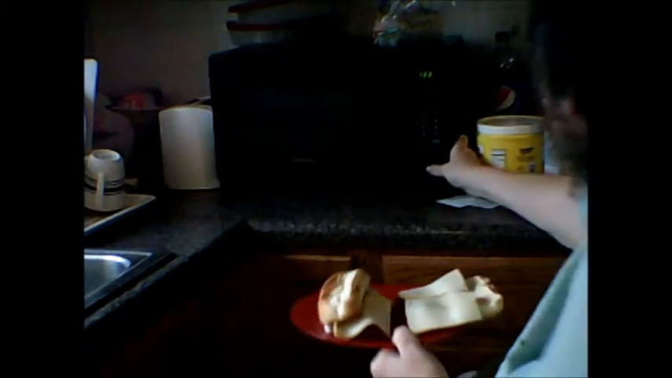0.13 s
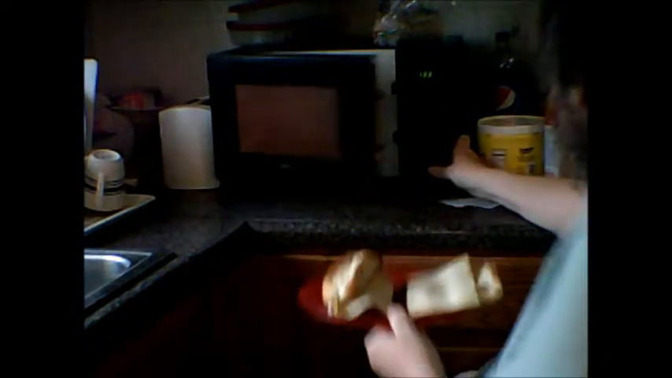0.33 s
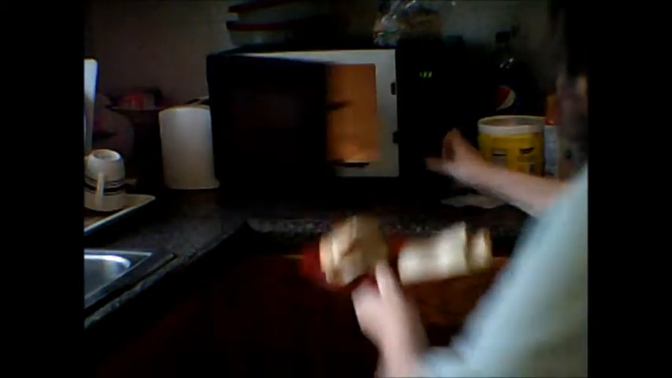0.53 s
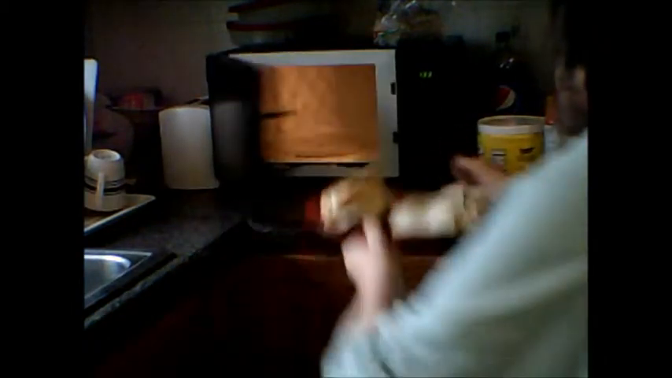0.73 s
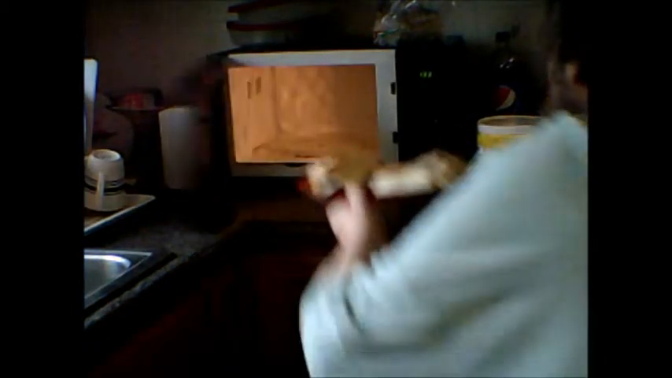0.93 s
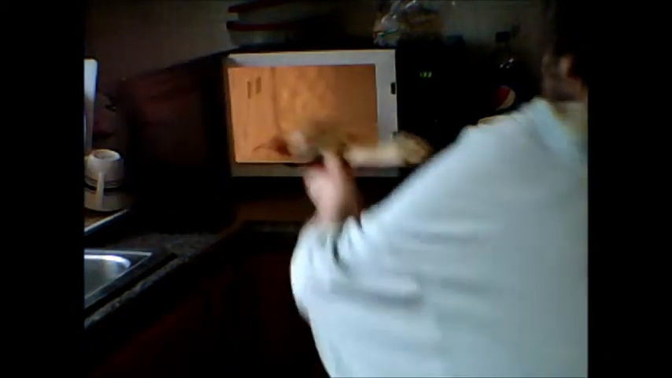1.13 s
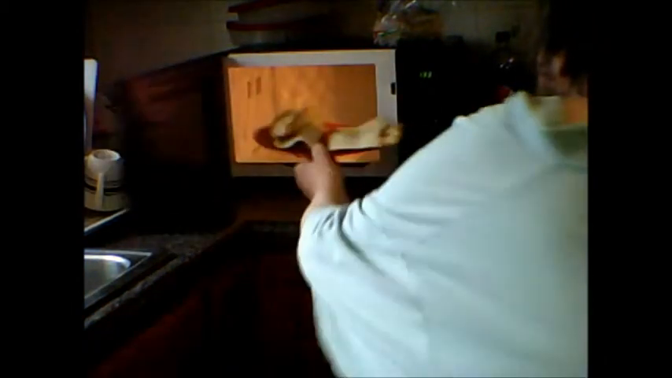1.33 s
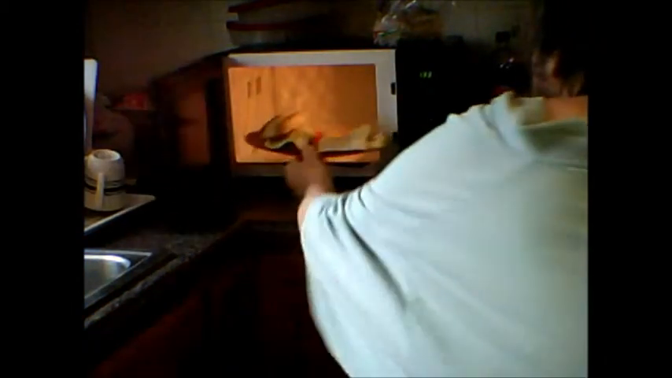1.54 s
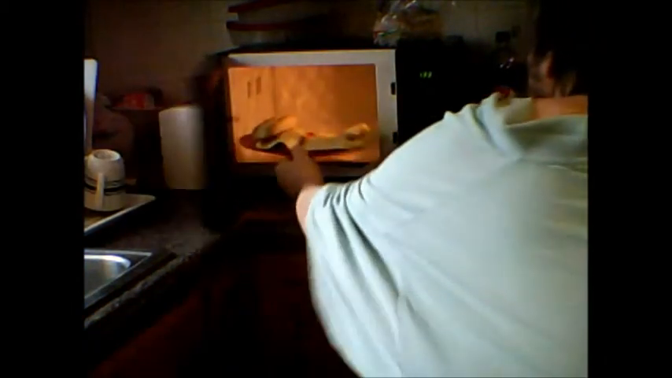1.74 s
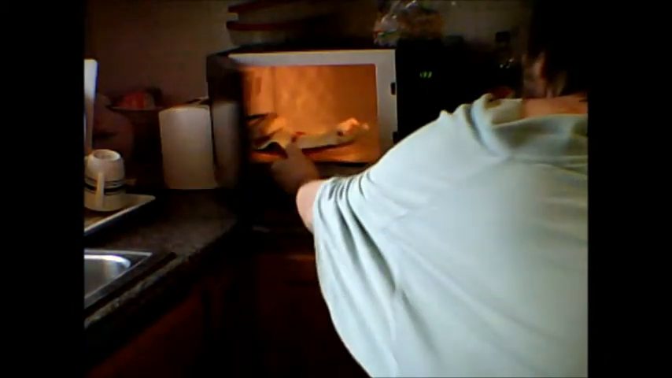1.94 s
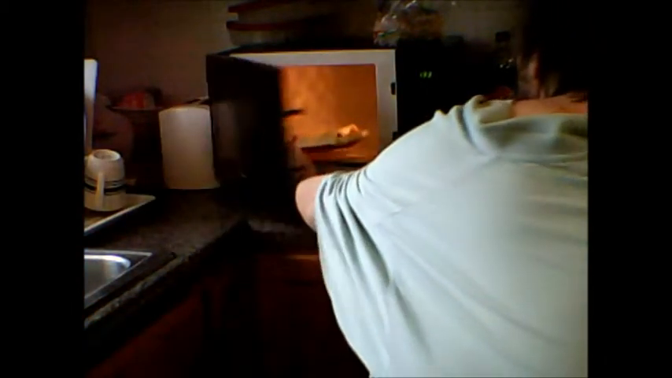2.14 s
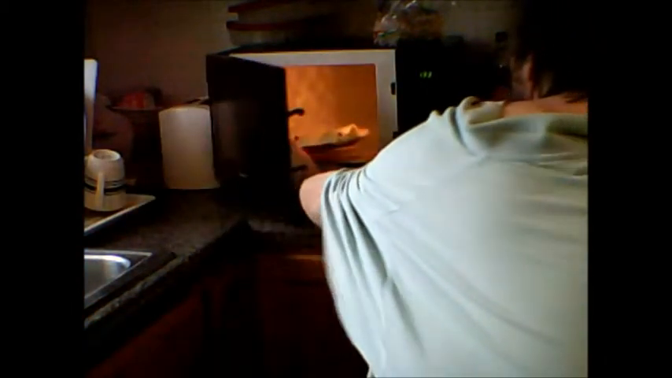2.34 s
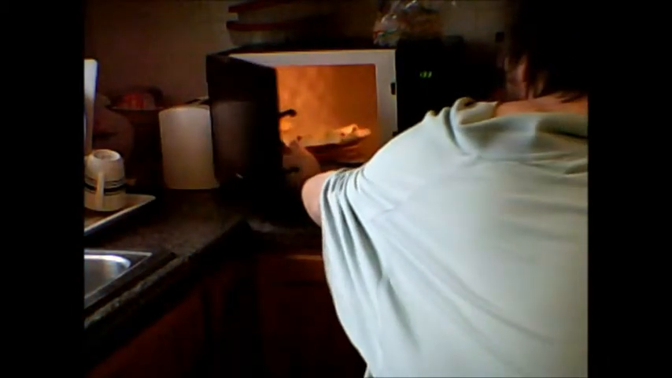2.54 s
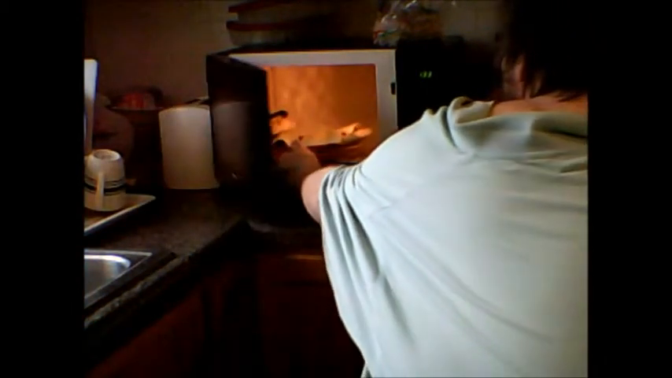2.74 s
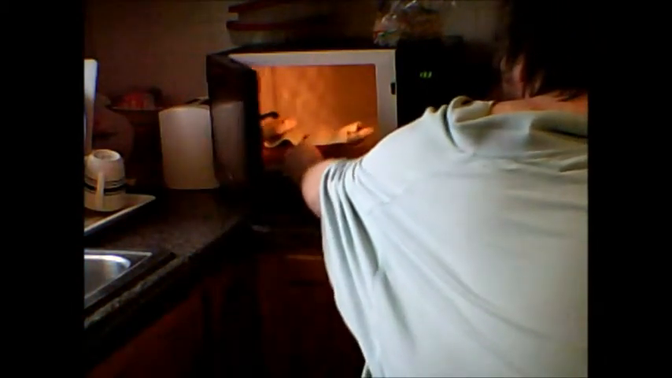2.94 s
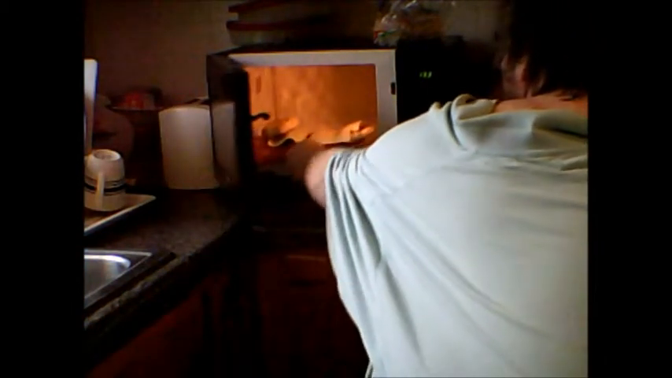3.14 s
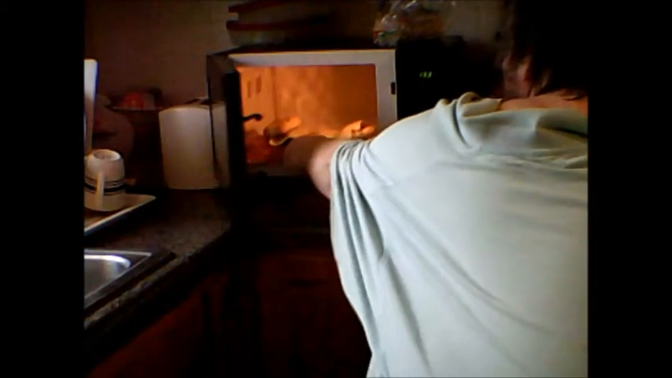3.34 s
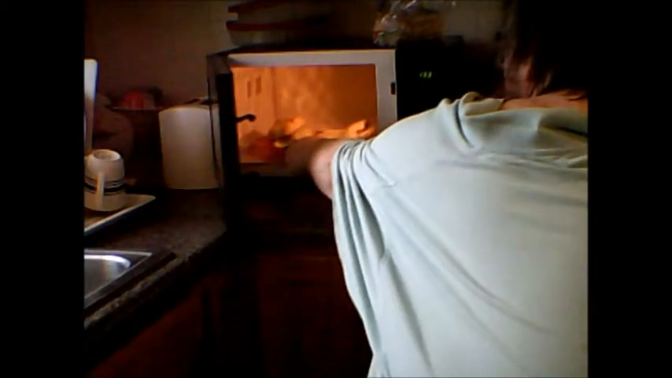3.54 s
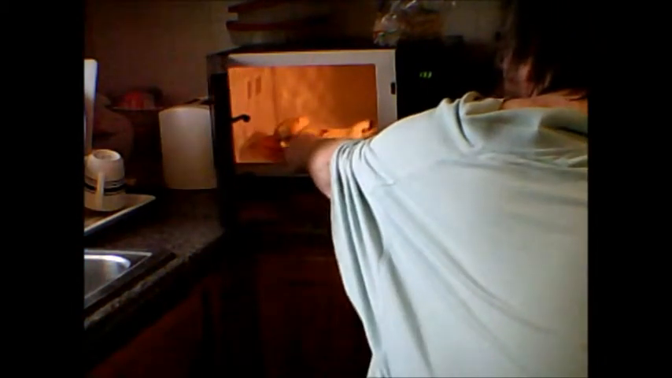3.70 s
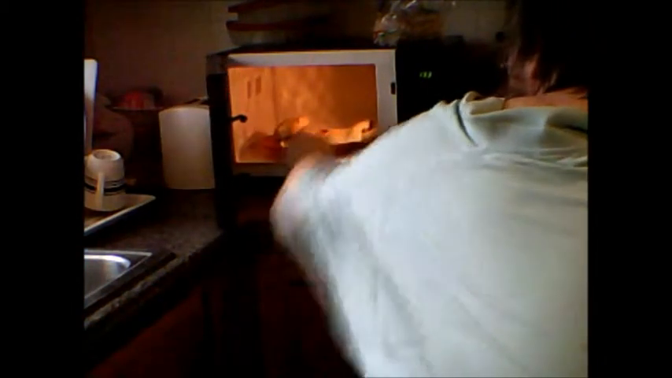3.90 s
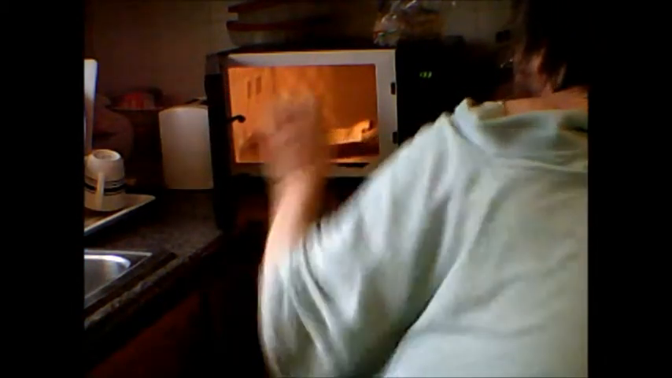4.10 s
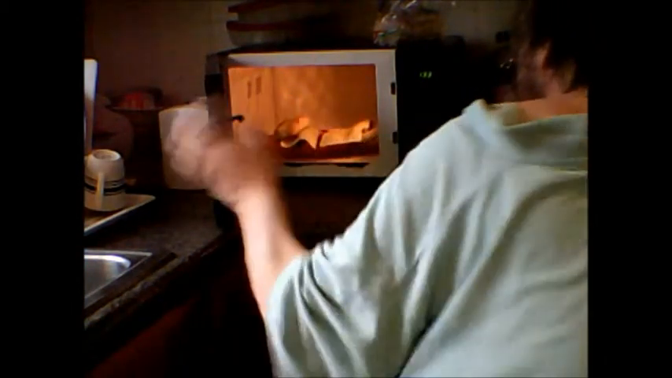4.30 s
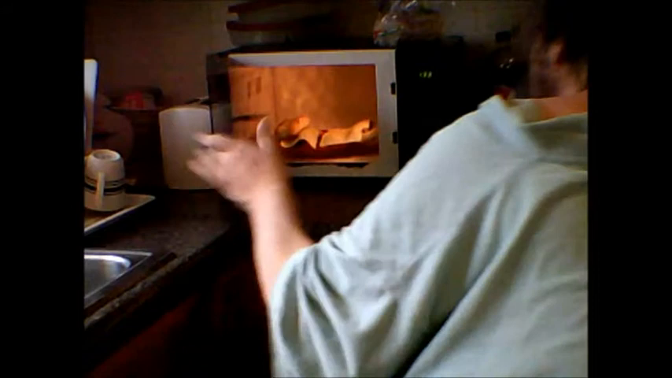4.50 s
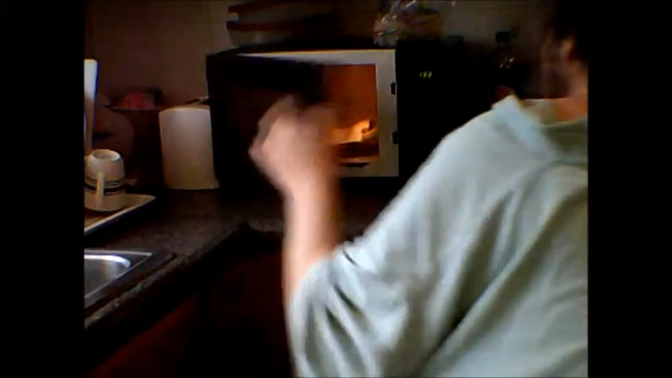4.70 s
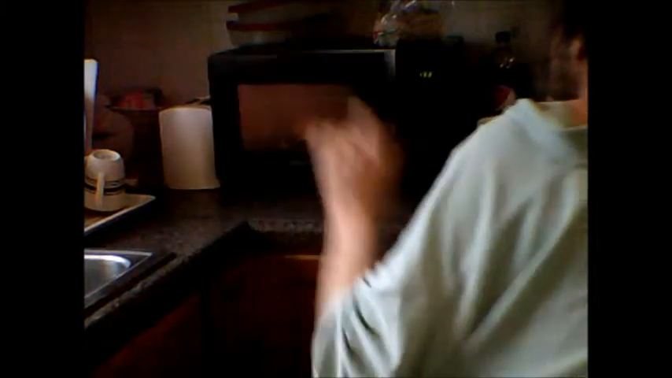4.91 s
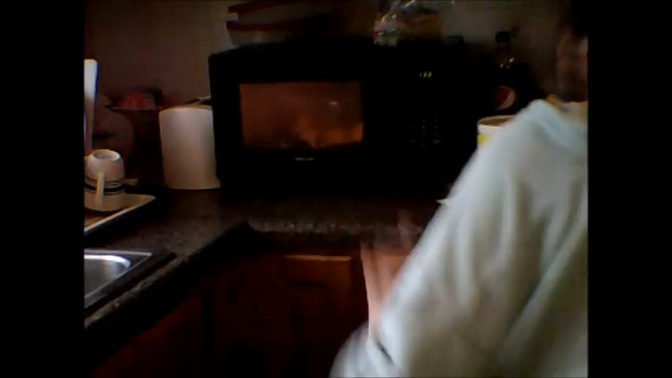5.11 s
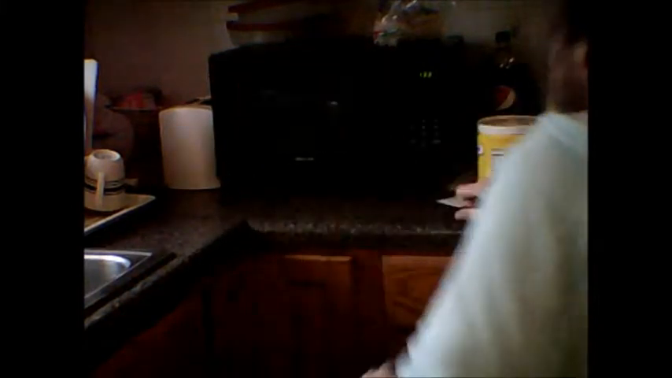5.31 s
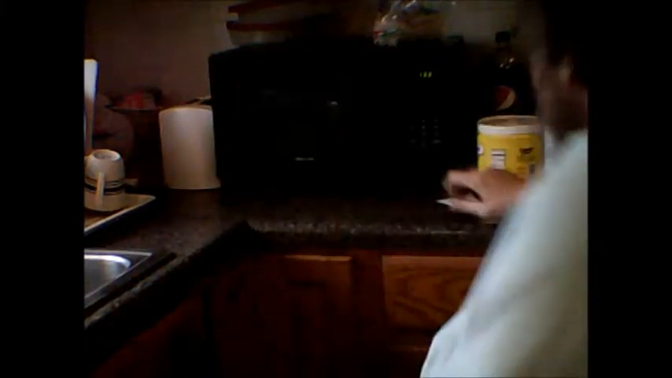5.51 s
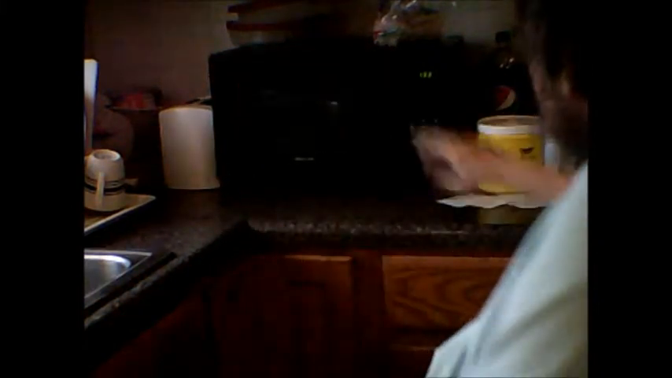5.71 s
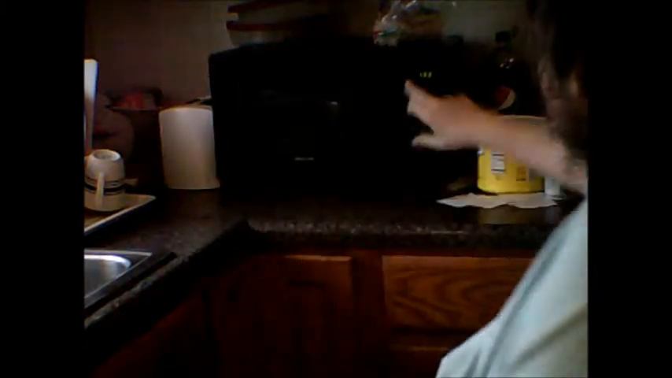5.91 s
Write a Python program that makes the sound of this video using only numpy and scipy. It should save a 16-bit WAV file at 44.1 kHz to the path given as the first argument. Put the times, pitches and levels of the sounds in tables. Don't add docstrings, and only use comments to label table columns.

```python
import sys
import numpy as np
from scipy import signal
from scipy.io import wavfile
from scipy.ndimage import uniform_filter1d

SR = 44100
rng = np.random.default_rng(int(sys.argv[2]) if len(sys.argv) > 2 else 0)


def voltage_ratio(level):
    return 10 ** (np.asarray(level, float) / 20)


def put_to_file(sound):
    columns = np.atleast_2d(sound).T
    safe = np.clip(columns, -1, 1)
    whole_steps = np.round(safe * 32767)
    wavfile.write(sys.argv[1], SR, whole_steps.astype(np.int16))


N = 266829


# frequency in Hz, level in dB, t60 in s.
BOOM = [(28.05, -14, 0.44), (45, 16.5, 0.28), (116.8, -4.5, 0.9)]


def blows(rows, hue, modes):
    out = np.zeros(N)
    for s, db, length, ring_db, thump_db in rows:
        clatter = colour(rattle(length), hue)
        add(out, s, voltage_ratio(db) * peaked(signal.fftconvolve(clatter, kitchen())))
        add(out, s, voltage_ratio(db + ring_db + 1) * ring(modes, 1.04 * length, damp=0.39))
        add(out, s, voltage_ratio(thump_db) * ring(BOOM, 0.013))
    return out


# start in seconds, level in dB, rattle length in s,
# ringing in dB over the level, thump level in dB.
SLAM = [
    (4.922, -16, 0.0084, 0.0044, -51),
    (4.934, -21.5, 0.014, 0.0073, -20.5),
    (4.942, -46.5, 0.0084, 0.0043, -33),
    (4.955, -27.5, 0.015, 0.0066, -42),
]
# frequency in Hz, level in dB per Hz.
SLAM_HUE = [(60, -19.5), (134, -2), (370, -12.5), (520, -7.5), (810, -9.5), (1030, -14.5), (2100, -15),
            (3300, -26.5), (5000, -26), (7500, -24.5)]
# frequency in Hz, level in dB, t60 in s.
SLAM_RING = [(131.4, -0.5, 0.31), (233, -20, 0.14), (312, 4, 0.26), (389, -15, 0.25), (484, 2.5, 0.13),
             (615, -8, 0.27), (664, -20, 0.62), (722.6, -2, 0.34), (815, -8, 0.6), (890, -9.5, 0.55),
             (996, -10.5, 0.48), (1118, -4, 0.22), (1336, -18, .25), (1532, -7, 0.15), (2038, -3, 0.14),
             (2457, -13, 0.1), (2520, -43, .2)]


def slam():
    return blows(SLAM, SLAM_HUE, SLAM_RING)


# start in seconds, level in dB, rattle length in s,
# ringing in dB over the level, thump level in dB.
HOOKS = [
    (4.879, -32, 0.017, 2.7, -53),
    (4.890, -42.5, 0.0077, 14.5, -57),
    (4.908, -42.5, 0.036, 21.1, -31),
]
# frequency in Hz, level in dB per Hz.
HOOKS_HUE = [(60, -14), (120, -19), (350, -17), (650, -21), (1800, -26.5), (2300, -32), (3400, -32),
             (5000, -40), (7500, -33.5)]
# frequency in Hz, level in dB, t60 in s.
HOOKS_RING = [(116.6, 2, 0.29), (266, -1.5, 0.1), (332.6, -9, 0.47), (836, -17.5, 0.38), (2060, -30, 0.3)]


def hooks():
    return blows(HOOKS, HOOKS_HUE, HOOKS_RING)


# start in seconds, level in dB, rattle length in s,
# ringing in dB over the level, thump level in dB.
STOP = [
    (1.094, -26, 0.01, -4.5, -46),
    (1.111, -30, 0.031, 4.5, -32),
]
# frequency in Hz, level in dB per Hz.
STOP_HUE = [(60, -13.5), (110, 7), (380, -12.5), (560, -2), (830, -4), (1200, -10), (2000, -19),
            (3300, -22), (5000, -25), (7500, -24.5)]
# frequency in Hz, level in dB, t60 in s.
STOP_RING = [(116, 0.5, 0.28), (238.2, -3, 0.53), (316, -7.5, 0.55), (459.3, 1, 0.25), (605, -2.5, 0.31),
             (704, -9, 0.45), (735, -11, 0.3), (824, -2.5, 0.52), (978, -7, 0.26), (1154, -7.5, 0.46),
             (1290, -21, 0.25), (1524, -14, 0.37), (1526, -21.5, 0.22), (1976, -5, 0.12)]


def stop():
    return blows(STOP, STOP_HUE, STOP_RING)


# start in seconds, level in dB, rattle length in s,
# ringing in dB over the level, thump level in dB.
LATCH = [
    (.164, -33.5, 0.0058, -4.5, -41.5),
    (.168, -32.5, 0.037, -10, -51),
]
# frequency in Hz, level in dB per Hz.
LATCH_HUE = [(60, -59), (130, 4), (190, -8.5), (360, -11), (840, -2), (1250, -12), (1600, -4.5),
             (2300, -13.5), (3200, -15.5), (5000, -19.5), (7500, -20)]
# frequency in Hz, level in dB, t60 in s.
LATCH_RING = [(580, -10, 1), (643, 8, 0.27), (846, -15, 0.33), (980, -10, 0.31), (1137, -14, 0.94),
              (1486, -36, 0.72), (1570, 15.5, 0.13), (1570, -6, 0.43), (1920, -18, 0.56), (2320, -24, 0.3),
              (2360, -22, 0.22), (3240, -10, 0.42), (3530, -27, 0.24), (3840, -37, 0.31)]


def latch():
    return blows(LATCH, LATCH_HUE, LATCH_RING)


# start in seconds, level in dB, rattle length in s,
# ringing in dB over the level, thump level in dB.
BUTTON = [
    (.0, -33.5, 0.02, 0, -55),
    (.036, -29.5, 0.017, 6, -56.5),
    (.046, -51.5, 0.017, 22, -36),
]
# frequency in Hz, level in dB per Hz.
BUTTON_HUE = [(60, -39), (100, -19), (130, -2.5), (340, -13), (600, -22), (870, -22), (2100, -32),
              (3400, -42.5), (5000, -40), (7500, -38.5)]
# frequency in Hz, level in dB, t60 in s.
BUTTON_RING = [(50, -3, 0.72), (129.4, -1.5, 0.38), (217, -13, 0.22), (301.6, -8, 0.28), (542, -19, 0.22),
               (813, -22, 0.24)]


def button():
    return blows(BUTTON, BUTTON_HUE, BUTTON_RING)


# start in seconds, level in dB, weight of the low thud in dB,
# dullness in dB per octave, rattle length in s.
KNOCKS = [(1.885, -20.5, -3, 9, 0.0056), (1.915, -24.5, -7, 9.5, 0.012), (1.958, -48, -7, 17, 0.016),
          (2.069, -40, -2, 9.5, .02), (2.14, -32, 3.5, 8.5, 0.042), (2.236, -26, 6.5, 9.5, 0.036),
          (2.283, -31.5, -22, 6.5, 0.014), (2.36, -37, 0, 23, .015), (2.538, -44.5, 13, 12, 0.04),
          (2.736, -43.5, 12.5, 8, 0.035), (2.797, -36, 4, 12, .022), (2.851, -40.5, 16, 7.5, .014),
          (2.885, -45, 7.5, 6, 0.089), (3.043, -41, 2, 6.5, 0.02), (3.079, -40.5, 3, 12, 0.04),
          (3.261, -37.5, -17, 10, 0.029), (3.363, -24, -1.5, 13, 0.0048), (3.409, -35, 1.5, 19, 0.023),
          (4.341, -27, 6, 19.5, 0.022)]
THUD_HZ, KNOCK_HZ, DULL_UP_TO_HZ, TOP_FALL_DB = 275, 556, 3000, -13.5


def knocks():
    out = np.zeros(N)
    for s, db, weight_db, dull_db, length in KNOCKS:
        thud_db = db + weight_db
        top_db = db - dull_db * np.log2(DULL_UP_TO_HZ / KNOCK_HZ)
        hue = [(90, thud_db - 12), (THUD_HZ, thud_db), (KNOCK_HZ, db),
               (DULL_UP_TO_HZ, top_db), (4500, top_db - 11), (7500, top_db + TOP_FALL_DB)]
        add(out, s, colour(contact(length), hue))
    return out


# start in seconds, level in dB.
RINGS = [
    (1.888, -35.5),
    (2.237, -45.5),
    (2.286, -39.5),
    (2.498, -57.5),
    (2.56, -65),
    (3.079, -53),
    (3.366, -43),
    (4.344, -41.5),
]
# frequency in Hz, level in dB, t60 in s.
PLATE = [
    [(225.6, -5, 0.54), (451, 7.5, 0.23), (576, -10, 0.33), (810, -17, 0.15), (1340, -4.5, 0.12),
     (1790, -4.5, 0.094)],
    [(404, -14, 0.17), (581, 2, 0.27), (820, 5, 0.23)],
    [(243, 1, 0.51), (276, 9, 0.16), (408, -2, 0.39), (581, -4, 0.89), (1740, -13, .4)],
    [(270, 10, 0.06), (574, -18, 0.27)],
    [(807, 0, 1)],
    [(353, -3, 0.38), (569, 0, 0.19)],
    [(346, 1, 0.27), (566, 0, 0.38), (694, -20, 0.18), (1650, -18, 0.24)],
    [(292, -1, 0.064), (455, -2, 0.27), (590, 1.5, 0.11), (770, -31, 0.14)],
]


def plate():
    out = np.zeros(N)
    for (s, db), modes in zip(RINGS, PLATE):
        add(out, s, voltage_ratio(db) * ring(modes, 0.003))
    return out


# start in seconds, level in dB, rattle length in s.
TOUCHES = [(0.869, -52, 0.021), (1.894, -48.5, 0.015), (2.14, -47, 0.017), (2.249, -48.5, 0.024),
           (2.298, -57, 0.018), (3.37, -53.5, 0.011), (3.496, -55.5, 0.057), (3.852, -55, 0.023),
           (4.345, -54, .012), (4.732, -53.5, 0.033), (5.855, -53, 0.014)]
# frequency in Hz, level in dB per Hz.
TOUCH_HUE = [(90, -8), (280, -1.5), (600, -0.5), (1500, 2), (3000, -3), (7500, -8)]


def touches():
    out = np.zeros(N)
    for s, db, length in TOUCHES:
        add(out, s, voltage_ratio(db) * colour(contact(length), TOUCH_HUE))
    return out


TICK_BEATS = [0, 2, 6, 7, 9, 11, 12, 14, 17, 20]
TICK_FIRST_S, TICK_EVERY_S = 1.3335, 0.20005
TICK_DB, TICK_SPREAD_DB = -56, 2.5


def ticks():
    out = np.zeros(N)
    hue = [(3500, -38), (5200, -36), (7500, -21)]  # (Hz, dB per Hz)
    for beat in TICK_BEATS:
        db = TICK_DB + TICK_SPREAD_DB * rng.standard_normal()
        burst = peaked(colour(rng.standard_normal(SR // 45), hue))
        add(out, TICK_FIRST_S + beat * TICK_EVERY_S, voltage_ratio(db) * burst)
    return out


def contact(length):
    return peaked(signal.fftconvolve(rattle(length, first=0.45), kitchen(direct_db=-3)))


def rattle(length, first=0.088):
    t = np.arange(SR // 5) / SR
    clicks = rng.standard_normal(len(t)) * voltage_ratio(2.47 * rng.exponential(1, len(t)))
    x = clicks * (1 - np.exp(-t / 0.0012)) * np.exp(-t / max(length, 0.001))
    x /= np.linalg.norm(x)
    x[0] = first
    return x


def ring(modes, rise, damp=0.99):
    t = np.arange(SR) / SR
    tones = np.zeros(SR)
    for (hz, db, t60), turn in zip(modes, rng.random(len(modes))):
        fall = voltage_ratio(db - 60 * t / np.clip(damp * t60, 0.02, 0.9))
        tones += fall * np.sin(2 * np.pi * (hz * t + turn))
    return peaked(tones * (1 - np.exp(-t / max(rise, 0.0005))))


# frequency in Hz, t60 in s.
KITCHEN = [(60, 0.35), (250, 0.43), (700, 0.33), (2000, 0.29), (7000, 0.27)]


def kitchen(direct_db=-12, late_db=-22):
    taps = np.zeros(SR)
    at = np.arange(100, SR - 20, 20)
    taps[at + rng.integers(0, 20, len(at))] = rng.choice([-1.0, 1.0], len(at))
    hz, t, z = signal.stft(taps, SR, nperseg=256)
    fall_db = -60 * t / read(KITCHEN, hz)[:, None]
    next_room = voltage_ratio(late_db + 0.41 * fall_db)
    tail = signal.istft(z * (voltage_ratio(fall_db) + next_room), SR, nperseg=256)[1]
    tail /= np.linalg.norm(tail)
    tail[0] += voltage_ratio(direct_db)
    return tail


# frequency in Hz, level in dB per Hz.
AIR = [(40, -40.5), (70, -0.5), (132, -4.5), (160, -8), (240, -11.5), (300, -17), (450, -22.5), (730, -23),
       (870, -25.5), (1060, -32), (2200, -35), (3400, -41.5), (5000, -40), (7500, -38.5)]
# frequency in Hz, level in dB per Hz.
RUMBLE_HUE = [(8, -21), (18, 10.5), (27, -1), (45, -8.5), (70, -9), (100, -30)]
AIR_DB, HUM_HZ, HUM_DB = -50.5, 124.5, -57.5


def house():
    air = voltage_ratio(AIR_DB) * noise(AIR, size=2048, patchy_db=0.5)
    rumble = voltage_ratio(rumble_db()) * noise(RUMBLE_HUE + [(200, -81)], size=8192, patchy_db=1)
    hum_hue = [(HUM_HZ - 12, -60), (HUM_HZ, 0), (HUM_HZ + 12, -60)]
    hum = voltage_ratio(HUM_DB) * noise(hum_hue, size=16384, patchy_db=2.5)
    return air + rumble + hum


# start in seconds, lift in dB over the rumble.
LIFTS = [
    (.05, 7),
    (1.1, 11.5),
    (4.95, 6),
]
LIFT_RISE_S, LIFT_FALL_S = 0.073, 0.18
RUMBLE_DB, SWELL_DB, SWELL_HZ = -40, 1.5, 1.614


def rumble_db():
    t = np.arange(N) / SR
    swell = sum(np.sin(2 * np.pi * (SWELL_HZ * t / k + rng.random())) for k in range(1, 7))
    db = RUMBLE_DB + SWELL_DB * evened(swell)
    for s, lift_db in LIFTS:
        after = np.maximum(t - s, 0)
        db += 2 * lift_db * (1 - np.exp(-after / LIFT_RISE_S)) * np.exp(-after / LIFT_FALL_S)
    return db


def noise(hue, size, patchy_db):
    frames, hz = N * 4 // size + 5, np.fft.rfftfreq(size, 1 / SR)
    a, b, patches = rng.standard_normal((frames, len(hz), 3)).T
    patches = evened(uniform_filter1d(uniform_filter1d(patches, 10, 0), 8, 1))
    z = (a + 1j * b) * voltage_ratio(read(hue, hz)[:, None] + patchy_db * patches)
    return evened(signal.istft(z, nperseg=size, noverlap=size * 3 // 4)[1][:N])


def colour(x, points):
    db = np.maximum(read(points, np.fft.rfftfreq(4096, 1 / SR)), -120)
    half = db * np.log(10) / 20
    full = np.concatenate([half, half[-2:0:-1]])
    response = np.exp(np.conj(signal.hilbert(full)))
    return signal.fftconvolve(x, np.fft.ifft(response).real)


def read(points, hz):
    f, value = np.transpose(points)
    return np.interp(np.log(hz + 1), np.log(f + 1), value)


def evened(x):
    return x / np.sqrt(np.mean(x ** 2) + 1e-20)


def peaked(x):
    return x / np.sqrt(uniform_filter1d(x ** 2, SR // 50).max())


def add(mix, s, sound):
    part = mix[max(round(s * SR), 0):][:len(sound)]
    part += sound[:len(part)]


def scene():
    oven = button() + latch() + stop() + hooks() + slam()
    tray = knocks() + plate() + touches()
    return (oven + tray + ticks() + house())[None]


def top_cut(x):
    return signal.sosfilt(signal.butter(12, 15800, fs=SR, output="sos"), x)


# frequency in Hz, level in dB.
MIC = [(3000, 1), (3500, -0.5), (3800, -11.5), (4400, -11.5), (4700, -17.5), (5400, -19), (6400, -12.5),
       (7200, -12), (7900, -16.5)]
EDGE_HZ = 7800


def record(dry):
    heard = colour(np.pad(dry[0], (0, 400), "reflect"), MIC)[None, :N + 400]
    soft = 0.75 * np.tanh(heard / 0.83)
    low_pass = signal.firwin(401, EDGE_HZ, window=("kaiser", 9), fs=SR)[None]
    narrow = signal.oaconvolve(soft, low_pass, "same")[:, :N]
    ending = np.minimum(np.arange(N)[::-1] / 200, 1)
    hiss = voltage_ratio(-98) * rng.standard_normal(dry.shape)
    return top_cut(np.clip(narrow, -0.475, 0.475) * ending + hiss)


dry = scene()
out = record(dry)
put_to_file(out)
```